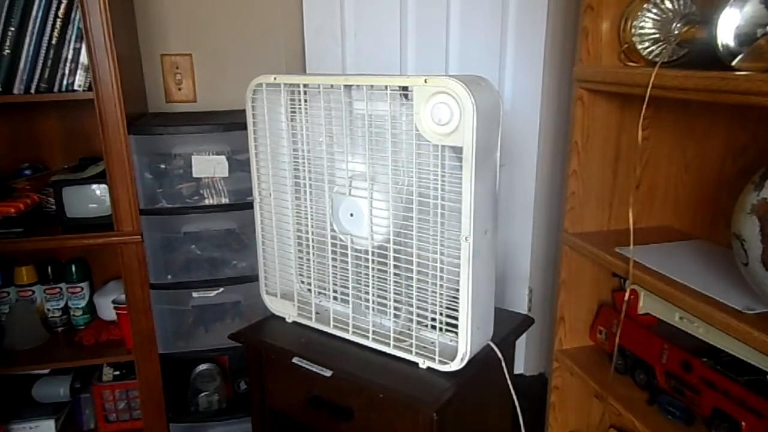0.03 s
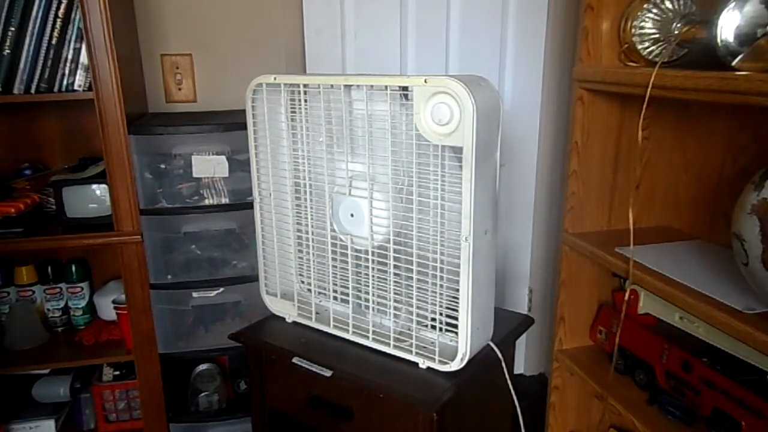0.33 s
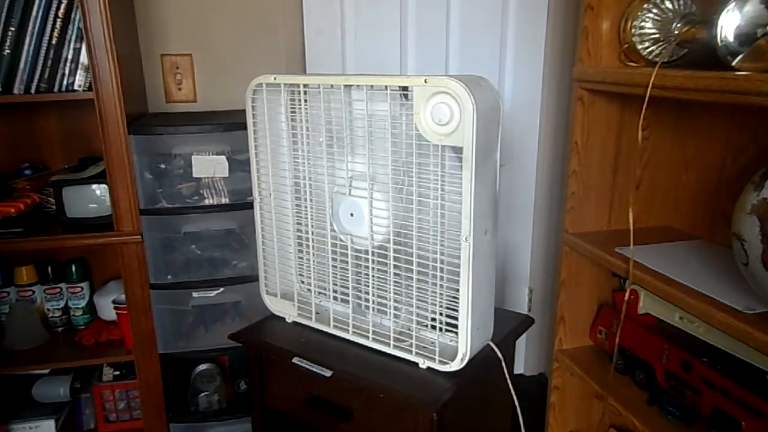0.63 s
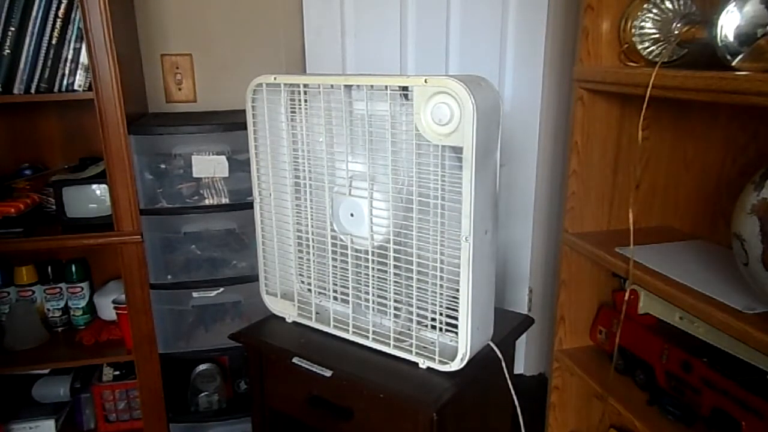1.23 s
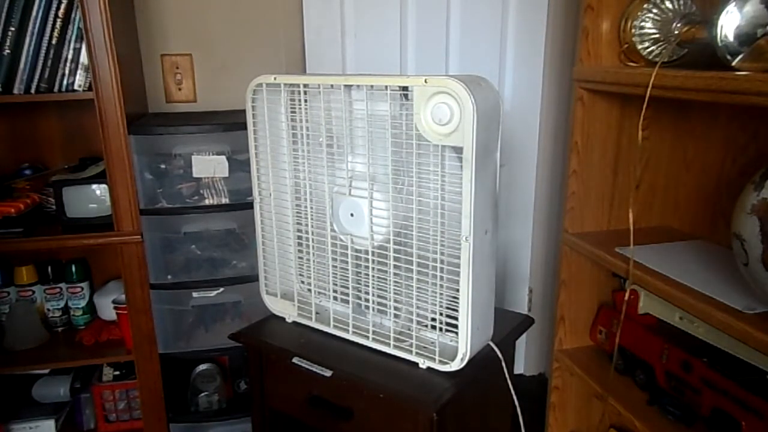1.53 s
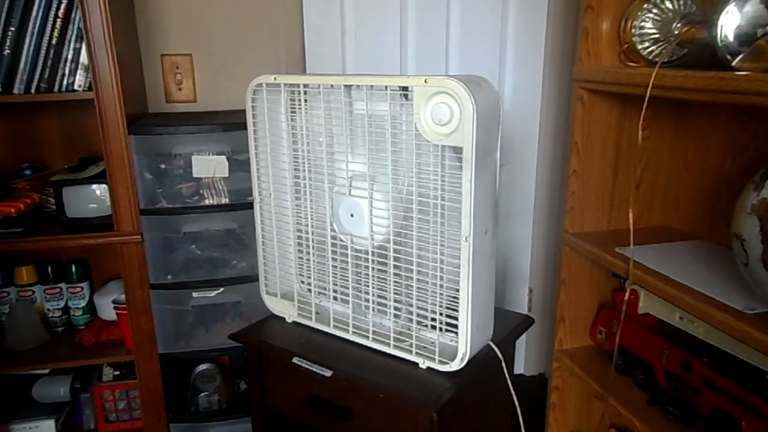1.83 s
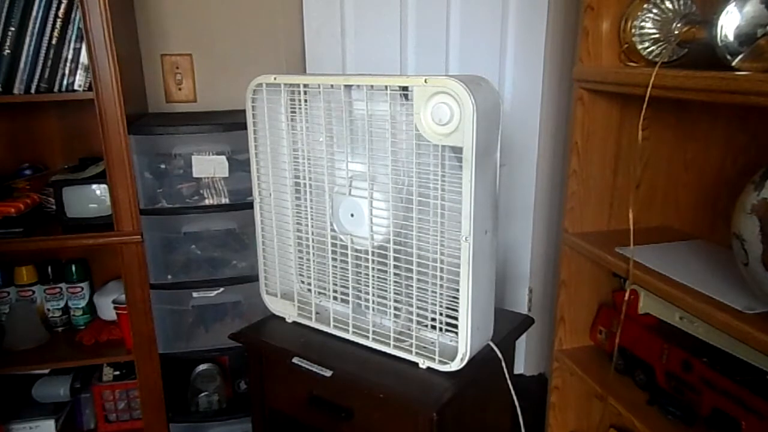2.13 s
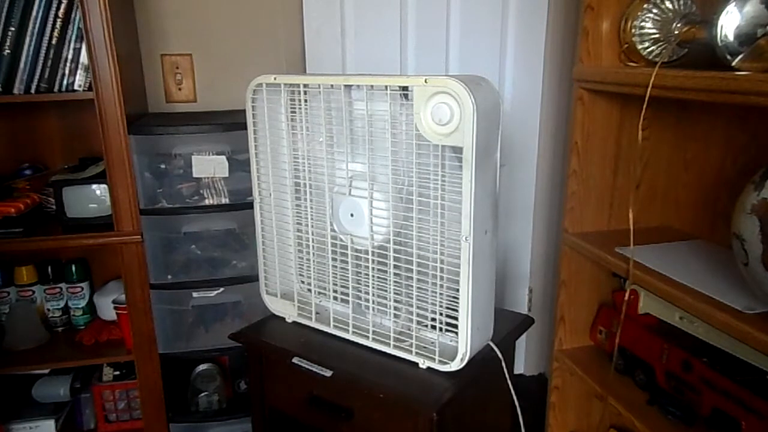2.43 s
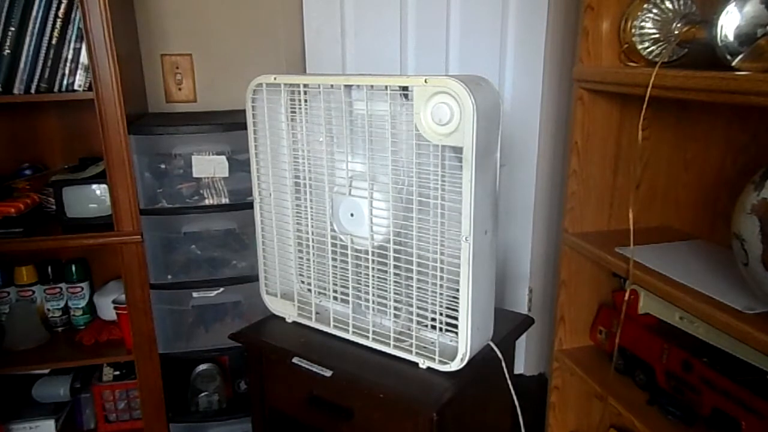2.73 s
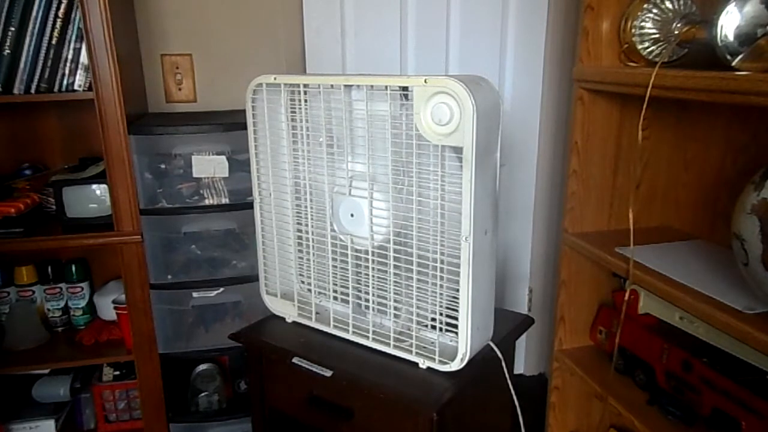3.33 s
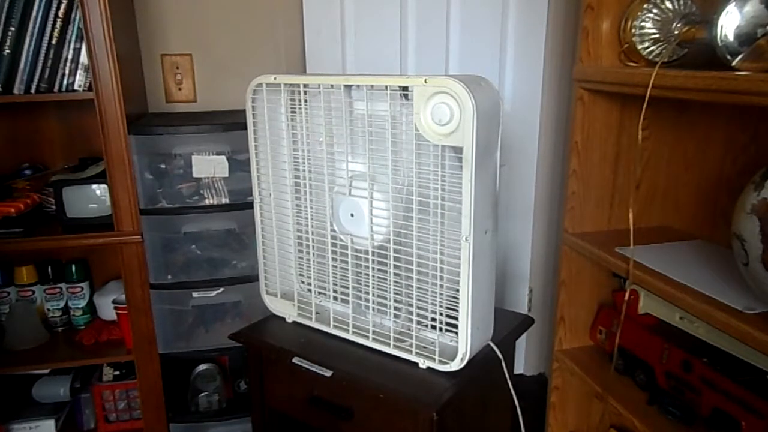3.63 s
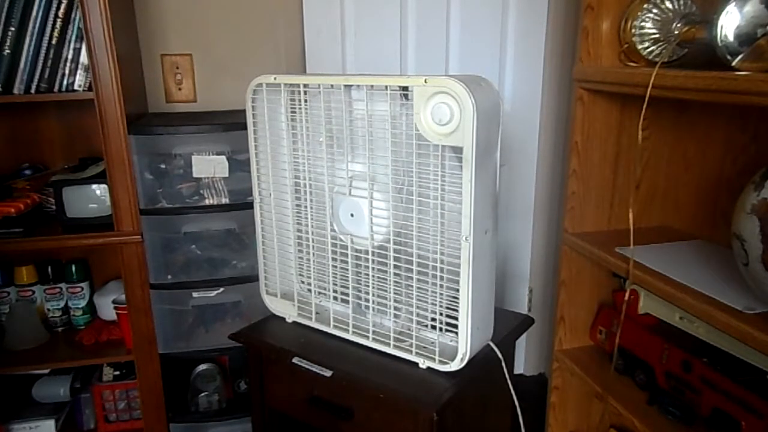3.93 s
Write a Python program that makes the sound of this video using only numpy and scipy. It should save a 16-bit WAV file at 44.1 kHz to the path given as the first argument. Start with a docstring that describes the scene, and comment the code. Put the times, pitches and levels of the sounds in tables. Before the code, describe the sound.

Box fan running in a small room, with motor hum and fast, rasping blade ticks.

```python
"""In a small furnished room, a box fan is still gathering speed. Its motor hums at twice the mains
rate and throbs with the rotor; the blades drone and push air through the grille. About once a turn
a warped blade scrapes the plastic housing: squeaks at first, then hard rasps, then lighter ticks.
The scrapes echo off the furniture, and a faint hiss lies under it all."""
import sys
import numpy as np
from scipy import signal
from scipy.fft import rfft, irfft
from scipy.io import wavfile
from scipy.ndimage import uniform_filter1d

SR = 44100
rng = np.random.default_rng(int(sys.argv[2]) if len(sys.argv) > 2 else 0)


def generate_wav(sig):
    """Save sig (samples, or channels by samples) to the path in sys.argv[1] as 16-bit PCM at SR."""
    pcm = np.round(np.clip(np.atleast_2d(sig).T, -1, 1) * 32767).astype(np.int16)
    wavfile.write(sys.argv[1], SR, pcm)


N = 176400  # 4 seconds


def undb(db):
    """Turn decibels into a number to multiply by."""
    return 10 ** (np.asarray(db) / 20)


def unit(x):
    """Scale a sound to an average (rms) level of 1."""
    return x / np.sqrt(np.mean(x ** 2) + 1e-20)


def wander(per_second):
    """A smooth random drift, roughly between -1 and 1."""
    hold = int(SR / per_second)
    steps = np.repeat(rng.standard_normal(N // hold + 1), hold)
    return 1.45 * uniform_filter1d(uniform_filter1d(steps, hold), hold)[:N]


def tone(cycles, db):
    """A pure tone, from a running count of its cycles and its rms level."""
    return np.sqrt(2) * undb(db) * np.sin(2 * np.pi * cycles)


def colour(x, points):
    """Make a sound darker or brighter along a curve of (frequency [Hz], gain [dB]) points."""
    hz, db = np.array(points).T
    freqs = np.maximum(np.fft.rfftfreq(len(x), 1 / SR), 1)
    return irfft(rfft(x) * undb(np.interp(np.log(freqs), np.log(hz), db)), len(x))


def resonate(x, peaks):
    """Make a sound ring at certain pitches; a negative boost cuts a gap instead."""
    for hz, width, db in peaks:
        ringing = signal.lfilter(*signal.iirpeak(hz, hz / width, fs=SR), x)
        x = x + (undb(db) - 1) * ringing
    return x


def room(x, ring_s):
    """The direct sound plus a wash of echoes that fades by 60 dB in ring_s seconds."""
    t = np.arange(SR // 4) / SR
    build_up = 1 - np.exp(-t / 0.00065)
    response = rng.standard_normal(len(t)) * np.exp(-np.log(1000) * t / ring_s) * build_up
    response /= np.linalg.norm(response)
    response[0] += undb(-9)  # the direct sound
    return signal.fftconvolve(x, response)[:N]


def add(out, start, x, db, window_s=0.05):
    """Mix in a short sound; db is its level as if its energy were spread over window_s."""
    i = max(int(start * SR), 0)
    x = x * undb(db) * np.sqrt(window_s * SR) / (np.linalg.norm(x) + 1e-12)
    out[i:i + len(x)] += x[:max(N - i, 0)]


def hiss(level_db=-68.5):
    """Faint, even microphone noise."""
    return undb(level_db) * unit(colour(rng.standard_normal(N), [(100, 0), (3000, -0.17), (16000, -1.8)]))


# How strong the rushing air is from bass to treble (frequency [Hz], relative level [dB])
AIR_COLOUR = [(20, 8.5), (45, -3.5), (75, -2.5), (110, 5.5), (180, -1.5), (250, -5), (300, -6.5),
              (420, -7.5), (700, -9), (950, -10), (1500, -14.5), (2500, -21.5), (4500, -27), (7000, -39.5),
              (14000, -46), (16000, -47)]
# Pitches where the air makes housing and room ring (pitch [Hz], width [Hz], boost [dB])
AIR_RINGS = [(210.6, 18, 6.5), (258.8, 10.5, 7), (371.6, 12.5, 6), (430.2, 7.9, 10.5), (534.6, 69, 6.5),
             (622, 18, 7), (724, 8.6, 7.5), (770.5, 4.3, 11), (1464, 9.7, 3.5), (1586, 21, 5.5),
             (2050, 13, 3)]


def air(speed, turns, level_db=-47, db_per_doubling=12, blade_count=5):
    """Air swirls through the grille, louder as the fan speeds up, and each blade chops it."""
    rush = unit(resonate(colour(rng.standard_normal(N), AIR_COLOUR), AIR_RINGS))
    flicker_db = 0.22 * wander(12)
    db = level_db + db_per_doubling * np.log2(speed / speed.mean()) + flicker_db
    chop = 1 + 0.081 * np.sin(2 * np.pi * blade_count * turns)
    return rush * undb(db) * chop


# Faint steady tones of the motor and its mounting (pitch [Hz], level [dB])
MOTOR_WHINE = [(213, -64), (249, -63), (378, -67.5), (431, -65.5), (498, -78), (600, -81), (720, -70)]
# Tones beside the hum (offset [times rotor speed], level when slow [dB], level when fast [dB])
THROB_TONES = [(-1, -71.5, -60.5), (1, -59, -72), (2, -45.5, -51.5)]


def motor(t, turns, pace, hum_hz=120, hum_db=-45):
    """The motor hums and whines; the rotor adds nearby tones that beat with the hum, so it throbs."""
    hum = tone(hum_hz * t, hum_db + 0.15 * wander(4.826))
    whine = sum(tone(hz * t, db) for hz, db in MOTOR_WHINE)
    throb = sum(tone(hum_hz * t + offset * turns, slow + (fast - slow) * pace)
                for offset, slow, fast in THROB_TONES)
    return hum + whine + throb


# Blade tones (pitch before rounding [times rotor speed], level when slow [dB], level when fast [dB])
BLADE_TONES = [(2, -65, -74), (3, -65, -63), (10, -60.5, -50), (20, -57, -54.5), (25, -80.5, -55.5),
               (45, -71.5, -64), (79.8, -80.5, -67.5)]


def blades(turns, pace, waver_db=0.7):
    """The spinning blades drone in wavering tones that rise with the speed."""
    return sum(tone(round(multiple) * turns, slow + (fast - slow) * pace + waver_db * wander(5.86))
               for multiple, slow, fast in BLADE_TONES)


# Light touches (time [s], length [s], start pitch [Hz], end pitch [Hz], level before echoes [dB])
SQUEAKY_TOUCHES = [(0.081, 0.021, 6250, 7400, -64.5), (0.207, 0.023, 5300, 6080, -60.5),
                   (0.322, 0.028, 5570, 6500, -57), (.441, .022, 7700, 7140, -67)]


def squeaks(roughness=0.038):
    """Under light pressure the blade sticks and slips in a rough, gliding squeal."""
    out, jitter = np.zeros(N), wander(1500)
    for start, length, from_hz, to_hz, db in SQUEAKY_TOUCHES:
        progress = np.linspace(0, 1, int(length * SR))
        glide_hz = from_hz + (to_hz - from_hz) * progress
        hz = glide_hz * (1 + roughness * jitter[int(start * SR):][:len(progress)])
        fade = np.sqrt(1 - progress ** 2)
        add(out, start, tone(np.cumsum(hz) / SR, 0) * fade, db)
    return room(out, ring_s=0.19)


def furniture_echoes(x, echo_db=-6.5):
    """Shelves and door throw back quick echoes; the overall level stays about the same."""
    echo = undb(echo_db)
    return (x + echo * room(x, ring_s=0.073)) / np.hypot(1, echo)


def ring_out(clicks, ring_s, direct_db=-5):
    """Clicks arrive directly; their energy fills housing and room and dies away as a noisy wash."""
    decay = np.exp(-2 * np.log(1000) / (ring_s * SR))
    energy = signal.lfilter([1 - decay], [1, -decay], clicks ** 2)
    return undb(direct_db) * clicks + np.sqrt(energy) * rng.standard_normal(N)


# How strong the scraped plastic is from low to high (frequency [Hz], gain [dB])
PLASTIC_COLOUR = [(500, 5), (1000, 0.5), (1500, 2), (2150, -1.5), (2650, -5.5), (3100, -3.5), (3700, -6.5),
                  (4400, -2.5), (6200, -2), (7200, -7), (9500, -13), (11200, -17.5), (13000, -19),
                  (14000, -15), (16000, -25)]
# Pitches where the housing rings (pitch [Hz], width [Hz], boost [dB])
HOUSING_RINGS = [(1100, 17, 5), (1450, 15, 6), (1510, 17, 5.5), (1823, 21, 6.5), (1973, 26, 7),
                 (2066, 19, 11.5), (2980, 69, 4), (3220, 76, 4), (4234, 47, 7.5), (4330, 49, 5),
                 (4615, 22, 8), (4910, 40, 5), (5330, 37, 6), (5530, 37, 4.5), (6130, 50, 2),
                 (6480, 49, 1.5), (8080, 110, 3.5), (8600, 180, -13), (8910, 60, 3.5), (9400, 80, 1.5),
                 (10800, 60, 2), (13000, 50, 3), (14100, 130, 2)]


def housing(x, low_hz, high_hz):
    """The plastic housing colours a sound and rings; only one range of pitch is kept."""
    band = signal.butter(4, [low_hz, high_hz], 'band', fs=SR, output='sos')
    return signal.sosfilt(band, resonate(colour(x, PLASTIC_COLOUR), HOUSING_RINGS))


# The four ranges of a scrape, low to high: body, rasp, edge, fizz (bottom [Hz], top [Hz],
# burst gain [dB], ring time [s], stretch [times base length], swell time [s], brush gain [dB])
SCRAPE_RANGES = [(743, 3780, -0.5, 0.2, 1.8, 0.0028, -15), (3510, 9000, -2.5, 0.24, 1.2, 0.00061, -18.5),
                 (8340, 12900, -2.5, 0.19, 0.51, .0004, -35), (12200, 20400, -1, .16, .7, .0004, -28)]
# Each time the blade hits the housing, with a base level for each range
# (time [s], body [dB], rasp [dB], edge [dB], fizz [dB], base length [s])
BLADE_HITS = [(0.0, -73, -65, -82, -79.0, 0.0079), (0.077, -60, -60.5, -81, -78.0, 0.017),
              (0.208, -61, -56, -68.0, -71.0, 0.013), (0.324, -56.5, -57.5, -72.0, -75.0, 0.034),
              (0.44, -61, -55.5, -78, -76.0, 0.034), (0.473, -55, -60, -69.0, -73.0, 0.0086),
              (0.584, -52, -51.5, -61, -63, 0.02), (0.709, -51.5, -51, -62, -69, 0.013),
              (0.795, -77.5, -58, -75, -72.0, 0.014), (0.827, -47.0, -47.0, -54, -59.0, 0.011),
              (0.916, -56.5, -55.5, -71, -73.0, 0.026), (0.942, -48, -48.0, -55, -57.0, 0.017),
              (1.054, -47.5, -46.5, -53.5, -56, 0.018), (1.171, -48.0, -49.5, -59, -62.0, 0.019),
              (1.263, -59, -57, -83, -81.0, 0.045), (1.273, -51, -49.5, -53, -58.0, 0.021),
              (1.393, -47.0, -48.5, -55.5, -63, 0.022), (1.51, -49.5, -51.0, -60, -64, 0.015),
              (1.619, -47.5, -50.0, -58, -66, 0.022), (1.738, -51.5, -51.5, -56.5, -59.0, 0.013),
              (1.846, -56.0, -60, -77.0, -80.0, 0.016), (1.957, -54.5, -60.5, -58.5, -64.0, 0.017),
              (2.07, -53.5, -62, -58, -62, 0.0074), (2.176, -51.0, -51.0, -57, -61.0, 0.014),
              (2.283, -53, -57, -63.5, -59, 0.016), (2.388, -52.5, -64, -70, -58, 0.02),
              (2.496, -52.0, -62.5, -68.5, -59, 0.02), (2.605, -54, -64, -65, -60.5, 0.02),
              (2.712, -53.0, -56.0, -66.0, -67.0, 0.02), (2.818, -55.5, -62, -72.0, -75.0, 0.019),
              (2.925, -56, -59.5, -73.0, -78.0, 0.016), (3.032, -62, -84, -87, -79.0, 0.0074),
              (3.141, -61.5, -67.5, -79, -72.0, 0.012), (3.241, -56.5, -59, -71.0, -71.0, 0.016),
              (3.351, -53.5, -57.5, -69.0, -73.0, 0.011), (3.449, -54.5, -60.0, -71.0, -74.0, 0.023),
              (3.558, -53, -56.5, -65.5, -68.0, 0.016), (3.659, -55.5, -57.5, -67, -72.0, 0.022),
              (3.759, -58, -62.5, -78, -76.0, 0.02), (3.85, -58.5, -65.5, -85, -77.0, 0.019),
              (3.969, -53, -56.5, -66, -70, 0.012)]


def scrapes(slips_per_s=3200, scatter_db=3.5, brush_lead_s=0.014, brush_fade_s=0.013):
    """The blade brushes the housing, catches with a tick, then sticks and slips in a burst of clicks."""
    t = np.arange(SR // 10) / SR
    shape = (len(BLADE_HITS), len(t))
    slips = (rng.random(shape) < slips_per_s / SR) * rng.choice([-1, 1], shape)
    slips = slips * undb(scatter_db * rng.standard_normal(shape))
    out = np.zeros(N)
    for k, (low_hz, high_hz, burst_db, ring_s, stretch, swell_s, brush_db) in enumerate(SCRAPE_RANGES):
        force = np.zeros(N)
        for (start, *levels, length), clicks in zip(BLADE_HITS, slips):
            swell = 1 - np.exp(-t / swell_s)  # the bright edge comes first, the body after it
            burst = clicks * swell * np.exp(-(t / (length * stretch)) ** 2)
            burst[0] += 2.6  # the tick
            brush = clicks[::-1] * np.exp(-(t / brush_fade_s) ** 2)
            add(force, start, burst, levels[k] + burst_db)
            add(force, start - brush_lead_s, brush, levels[k] + brush_db)
        housing_gain = np.linalg.norm(housing(signal.unit_impulse(len(t), 'mid'), low_hz, high_hz))
        out += housing(ring_out(force, ring_s), low_hz, high_hz) / housing_gain
    return out


# The fan speeding up (time [s], speed [turns per second])
FAN_SPEED = [(0, 8.041), (0.4, 8.406), (1, 8.565), (2, 9.084), (3, 9.446), (4, 9.757)]


def scene(first_throb_s=0.043):
    """The fan's speed drives throb, drone and air; scrapes and squeaks come at their listed times."""
    t = np.arange(N) / SR
    speed = np.interp(t, *np.array(FAN_SPEED).T)
    pace = (speed - speed.min()) / np.ptp(speed)  # 0 when slowest, 1 when fastest
    turns = np.cumsum(speed) / SR
    turns -= np.interp(first_throb_s, t, turns)  # the hum swells twice a turn from here on
    fan = motor(t, turns, pace) + blades(turns, pace) + air(speed, turns)
    return (fan + furniture_echoes(scrapes()) + squeaks() + hiss())[None]


def record(dry, top_hz=15900):
    """Cut away the very highest treble."""
    return signal.sosfilt(signal.ellip(10, .2, 70, top_hz, fs=SR, output='sos'), dry)


dry = scene()
out = record(dry)
generate_wav(out)
```